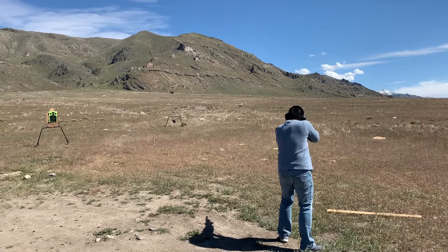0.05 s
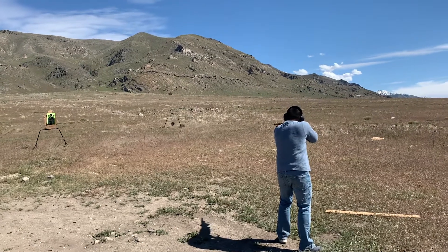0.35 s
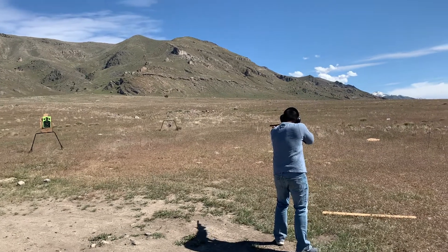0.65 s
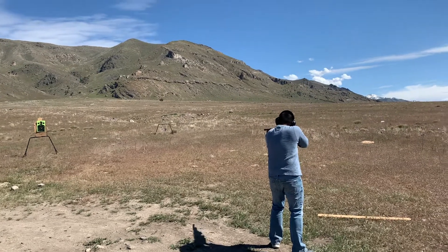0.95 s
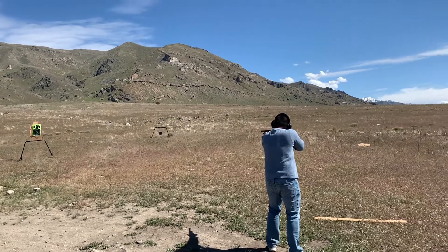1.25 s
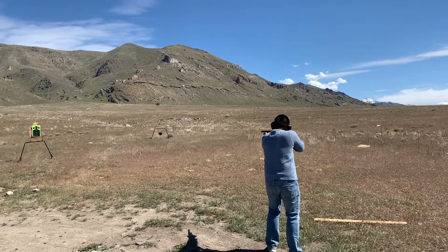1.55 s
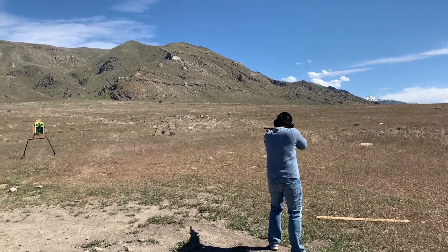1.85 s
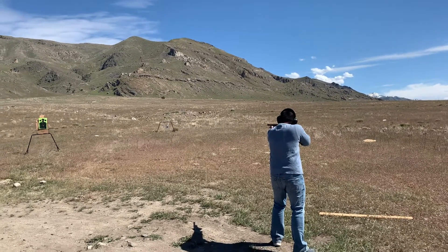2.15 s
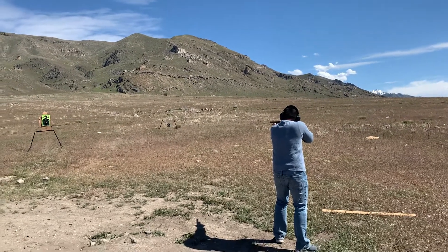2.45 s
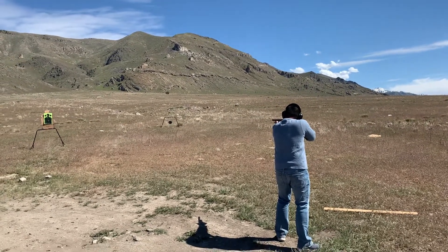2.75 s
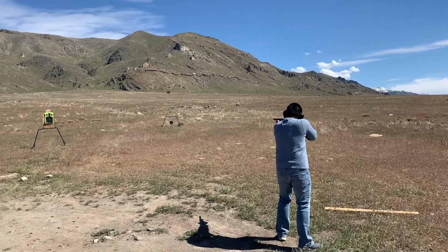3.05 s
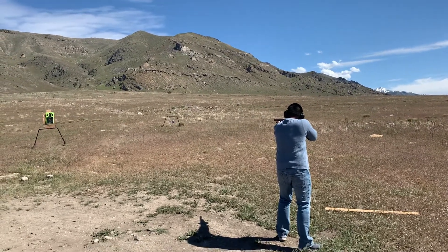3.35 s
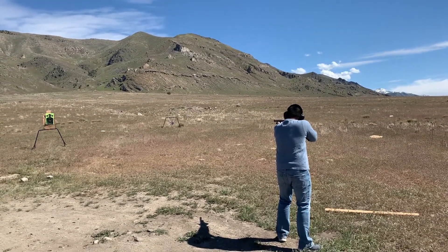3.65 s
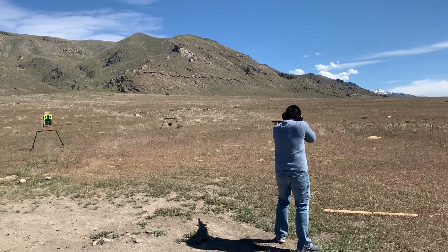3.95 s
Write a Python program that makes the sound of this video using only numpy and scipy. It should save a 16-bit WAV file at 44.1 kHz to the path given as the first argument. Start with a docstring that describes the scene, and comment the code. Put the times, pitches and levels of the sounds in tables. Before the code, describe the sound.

A pump-action shotgun is racked once a few metres away on an open plain: the slide scrapes back with a sharp clack, then snaps forward and locks. Afterwards, growing gusts of wind rumble and thump on the microphone.

```python
"""A pump-action shotgun is racked a few metres from a phone on an open plain: the slide scrapes back
and slams on its stop, then runs forward and locks. Each blow is a burst of steel clatter that rings
the gun's modes; rough ground scatters a short return. Wind buffets the microphone in growing gusts:
rumble, eddies and pressure pulses over a smooth rush. Far off, a small bird calls once, faintly."""
import sys
import numpy as np
from scipy import signal
from scipy.fft import rfft, irfft
from scipy.io import wavfile
from scipy.ndimage import uniform_filter1d

SR = 44100
rng = np.random.default_rng(int(sys.argv[2]) if len(sys.argv) > 2 else 0)


def wav_record(signal):
    """Record a signal, one row per channel, as 16-bit PCM in the file named by sys.argv[1]."""
    frames = np.transpose(np.atleast_2d(signal))
    bounded = np.clip(frames, -1, 1)
    # unit amplitude maps onto the largest positive 16-bit level
    quanta = np.round(bounded * 32767).astype(np.int16)
    wavfile.write(sys.argv[1], SR, quanta)


N = 176400
TIME_S = np.arange(N) / SR
FREQ_HZ = np.maximum(np.arange(N // 2 + 1) * SR / N, 1)

# Blows in the action. Each row: start in seconds, level in dB, clatter decay in seconds, ring centre in Hz.
BLOWS = [(0.48, -61.5, .001, 2520), (0.67, -57, 0.0064, 1700), (.698, -52.5, 0.0045, 2250),
         (.717, -54, 0.0028, 3230), (0.73, -49, 0.0037, 2060), (0.7751, -43, 0.0026, 10900),
         (.7785, -24.5, .0015, 1500), (0.7811, -27.5, 0.0014, 4670), (0.794, -34.5, 0.0016, 10960),
         (0.797, -34.5, .006, 800), (.808, -44, 0.0049, 1631), (.832, -55.5, 0.015, 1742),
         (.902, -71, 0.016, 2050), (.997, -60.5, 0.0055, 2120), (1.027, -61.5, 0.0085, 5000),
         (1.0469, -44.5, 0.0086, 2550), (1.077, -52, 0.0033, 4440), (1.0826, -46, 0.0027, 1510),
         (1.1268, -38, 0.0012, 1230), (1.1307, -34.5, 0.0053, 7300), (1.1387, -36, 0.0069, 1080)]
# Modes of receiver, barrel and fore-end. Each row: frequency in Hz, relative level in dB.
GUN_MODES = [(390, 1), (660, -1.5), (886, 6.5), (1170, -3.5), (1372, -1.5), (1495, 2), (1770, -6.5),
             (2108, -4), (2620, -0.5), (4020, 1.5), (4430, 0), (4980, -1.5), (5310, -3.5), (5850, -4.5),
             (7260, -7), (10450, 1)]
# Slide rubbing on its rails. Each row: start in seconds, end in seconds, level in dB.
SLIDE_STROKES = [(0.66, .782, -58.5), (1.05, 1.13, -53), (1, 1.1, -73.5)]
# Gun at the two microphone ports. Each row: frequency in Hz, left lead in radians, left over right in dB.
MIC_PORTS = [(700, 0, 0), (1250, -.7, -4), (1800, -.8, -2.5), (2600, .9, -7), (4800, 1.8, 1.5),
             (11000, 1.7, .5)]
# Light knocks and hard wind buffets. Each row: start in seconds, level in dB, upper cutoff in Hz.
KNOCKS = [(0.4827, -52, 573), (0.8811, -52.5, 2000), (1.3378, -54, 1040), (3.19, -66.5, 1900)]
BUFFETS = [(0.043, -31.5, 124), (0.247, -35, 66.4), (1.503, -51, 390), (1.570, -52, 540), (1.609, -52, 591),
           (1.62, -48, 645), (1.625, -34.5, 131.4), (1.770, -54, 595), (1.979, -34.5, 85.7),
           (2.131, -51.5, 516), (2.3721, -44, 425), (2.409, -47.5, 607), (2.426, -43.5, 600),
           (2.433, -42, 560), (2.467, -48, 779), (2.592, -56.5, 646), (2.661, -45.5, 436),
           (2.735, -30, 155), (2.782, -41, 400), (2.812, -38.5, 793), (2.8131, -29, 232.4),
           (2.903, -30, 147.8), (2.9285, -24.5, 190), (2.9335, -43.5, 725), (2.977, -27.5, 167.4),
           (3.012, -34.5, 260), (3.125, -42, 765), (3.466, -49, 703.4)]
# Spells of fluttering air. Each row: start in seconds, end in seconds, level in dB.
FLUTTER_SPELLS = [(0.122, 0.188, -56), (1.5, 1.663, -54), (2.054, 2.163, -55.5), (2.398, 2.5, -45),
                  (2.49, 2.72, -56), (2.736, 3.294, -48), (3.301, 4.019, -58)]
# Wind envelopes. Each row: time in seconds, relative level in dB.
RUMBLE_ENVELOPE = [(0, -31.5), (.07, -50), (.35, -63), (.62, -62), (1.43, -78.5), (1.5, -46.5), (1.64, -46),
                   (1.89, -65), (2.05, -47), (2.22, -54.5), (2.65, -45), (2.77, -39), (2.97, -30),
                   (3.07, -44.5), (3.16, -36), (3.35, -49), (3.48, -43), (3.6, -55.5), (3.77, -31.5),
                   (3.86, -47)]
RUSH_ENVELOPE = [(1.4, -76.5), (2.6, -77), (3.15, -54), (3.62, -65), (3.78, -53), (4, -62)]
HISS_ENVELOPE = [(1.55, -94), (1.76, -81.5), (2, -96), (3.12, -79.5), (3.2, -68.5), (3.6, -86.5),
                 (3.8, -75)]
# Spectra of steel on steel, wind layers and open air. Each row: frequency in Hz, relative level in dB.
STEEL_SPECTRUM = [(100, -24.5), (360, -6), (1500, -1), (2500, 0.5), (3200, -3.5), (4400, -2.5), (8400, -12),
                  (11000, -5.5), (13600, -21.5), (15300, -14.5)]
RUMBLE_SPECTRUM = [(22, -21), (48, 8), (90, 3.5), (160, -8.5), (240, -21.5), (600, -82.5)]
FLUTTER_SPECTRUM = [(60, -5.5), (160, 16), (280, 9), (450, 0.5), (800, -20), (1200, -27), (1700, -64)]
BUFFET_SPECTRUM = [(1250, 0), (1650, -11)]
RUSH_SPECTRUM = [(300, 10), (600, -2), (1300, -18), (1800, -34), (9000, -70.5)]
HISS_SPECTRUM = [(400, -11), (1250, 6), (1520, -2), (1850, -20), (5000, -41)]
AIR_SPECTRUM = [(410, -29.5), (700, -4.5), (1770, -5.5), (8000, -18.5), (11200, -14), (16000, -26)]
# Bird note. Each row: start in seconds, length in seconds, start pitch in Hz, end pitch in Hz, level in dB.
BIRD_NOTES = [(1.933, 0.041, 3570, 3200, -79)]

HARD_BLOW_DB = -32.5
GUN_SINK_CYCLES, WIND_SINK_CYCLES = 2, 1.8
STEREO_CORNER_HZ = 2000  # the ports differ mostly above this


def gun(max_oblique_share=.55):
    """Action and knocks at the two ports, each with its ground return."""
    lead_rad, balance_db = over_hz(MIC_PORTS, column=1), over_hz(MIC_PORTS, column=2)
    oblique_share = max_oblique_share / (1 + (STEREO_CORNER_HZ / FREQ_HZ) ** 2)
    direct, oblique = rfft(knocks() + action()), rfft(action())
    ports = []
    for side in (1, -1):
        turn_rad = side * np.arcsin(oblique_share)
        blend = direct * np.cos(turn_rad) + oblique * np.sin(turn_rad)
        near = irfft(blend * undb(side * balance_db / 2) * np.exp(.5j * side * lead_rad), N)
        ports.append(near + ground_scatter(near))
    return np.array(ports)


def action(min_attack_s=.0008, ring_db=-2):
    """Each blow clatters and rings the gun; the slide scrapes between."""
    t = TIME_S[:N // 32]
    clatter, rings = 0, 0
    for start_s, db, decay_s, centre_hz in BLOWS:
        attack_s = min_attack_s * max(1, undb((HARD_BLOW_DB - db) / 5))  # light contacts creep in
        rise = np.minimum(t / attack_s, 1)
        fall = np.exp(-np.maximum(t - 2 * attack_s, 0) / decay_s)
        clatter += place(undb(db) * chatter(t, db) * rise * fall, start_s)
        rings += place(undb(db + ring_db) * unit_hit(rise * ring(t, centre_hz)), start_s)
    return sink(colour(clatter, over_hz(STEEL_SPECTRUM)) + rings + slide_scrape(), GUN_SINK_CYCLES)


def chatter(t, blow_db, grain_db=4, grains_per_s=900):
    """Parts chatter against each other: grainy noise, brighter for harder blows."""
    bins_hz = np.arange(len(t) // 2 + 1) * SR / len(t)
    bright_db = np.interp(bins_hz, FREQ_HZ, tilt(db_per_octave=.02 * (blow_db - HARD_BLOW_DB)))
    steel_db = np.interp(bins_hz, FREQ_HZ, over_hz(STEEL_SPECTRUM))
    grit = irfft(rfft(rng.standard_normal(len(t))) * undb(bright_db), len(t))
    grit /= np.sqrt(np.mean(undb(steel_db + bright_db) ** 2))  # offsets the steel filter's gain
    for _ in range(2):
        grain = np.interp(t * grains_per_s, np.arange(256), rng.standard_normal(256))
        grit *= unit(undb(grain_db * grain))
    return grit


def ring(t, centre_hz, width_octaves=.75, t60_s=.035, detune_share=.012):
    """Modes near the blow's centre frequency ring; they shift from blow to blow as the parts move."""
    hz, mode_db = np.array(GUN_MODES).T[:, :, None]
    reach = 1 / (1 + (np.log2(hz / centre_hz) / width_octaves) ** 2) ** 2
    detune, phase = rng.standard_normal((2, len(hz), 1))
    tones = np.sin(2 * np.pi * hz * (1 + detune_share * detune) * t + np.pi * phase)
    return (reach * undb(mode_db - 60 * t / t60_s) * tones).sum(0)


def slide_scrape(grain_db=4.5):
    """Grainy friction of the slide on its rails."""
    friction = noise() * undb(grain_db * wander(rate_hz=250))
    rub = unit(colour(friction, over_hz(STEEL_SPECTRUM) + tilt(db_per_octave=-2)))
    return rub * gates(SLIDE_STROKES, edge_s=.006)


def knocks(rattle_decay_s=.0033):
    """Light knocks sink into thuds, each smeared by a brief rattle."""
    thuds = sum(thud(*row, low_hz=280, cycles=GUN_SINK_CYCLES, order=2) for row in KNOCKS)
    return smear(thuds, noise() * np.exp(-TIME_S / rattle_decay_s))


def ground_scatter(near, level_db=-19, t60_s=.21):
    """Short diffuse return from rough ground."""
    response = colour(noise() * undb(-60 * TIME_S / t60_s), tilt(db_per_octave=1))
    return undb(level_db) * smear(near, response)


def wind_rumble(gain_db=2, waver_db=2.1):
    """Gusts on the microphone: low noise, levelled, then swelled."""
    low = colour(noise(), over_hz(RUMBLE_SPECTRUM))
    low /= np.sqrt(uniform_filter1d(low ** 2, size=3500, mode="wrap"))
    return low * undb(gain_db + waver_db * wander(rate_hz=30.056)) * over_time(RUMBLE_ENVELOPE)


def wind_buffets():
    """Single hard pressure pulses on the microphone."""
    pulses = sum(thud(*row, low_hz=120, cycles=WIND_SINK_CYCLES, order=5) for row in BUFFETS)
    return colour(pulses, over_hz(BUFFET_SPECTRUM))


def wind_flutter(eddies_per_s=220, spread_db=8.5):
    """Showers of small eddies, each a pulse of random size and sign."""
    arrivals = rng.random(N) < eddies_per_s / SR
    eddies = arrivals * undb(spread_db * np.minimum(noise(), 1)) * np.sign(noise())
    flutter = sink(colour(eddies, over_hz(FLUTTER_SPECTRUM)), WIND_SINK_CYCLES)
    return unit(flutter) * gates(FLUTTER_SPELLS, edge_s=.0059)


def wind_flow(spectrum, envelope, waver_db, waver_hz):
    """Smooth rush or hiss of wind, wavering in level."""
    flow = unit(colour(noise(), over_hz(spectrum)))
    return flow * undb(waver_db * wander(waver_hz)) * over_time(envelope)


def bird():
    """A distant bird's falling note."""
    call = np.zeros(N)
    for start_s, length_s, from_hz, to_hz, db in BIRD_NOTES:
        progress = np.clip((TIME_S - start_s) / length_s, 0, 1)
        pitch_hz = from_hz + (to_hz - from_hz) * progress
        call += undb(db) * np.sin(np.pi * progress) * np.sin(2 * np.pi * np.cumsum(pitch_hz) / SR)
    return call


def open_air(level_db=-86):
    """Faint hiss of open country, wider in the treble."""
    mid, side = (unit(colour(noise(), over_hz(AIR_SPECTRUM))) for _ in range(2))
    side = irfft(rfft(side) * np.minimum(FREQ_HZ / STEREO_CORNER_HZ, 1), N)
    return np.array([mid + side, mid - side]) * undb(level_db) / np.sqrt(2)


def thud(start_s, db, top_hz, low_hz, cycles, order):
    """Band-limited pressure pulse that sinks in pitch."""
    lowpass = signal.butter(order, top_hz, fs=SR, output="sos")
    highpass = signal.butter(2, min(low_hz, top_hz / 2), "high", fs=SR, output="sos")
    pulse = signal.sosfilt(np.vstack([lowpass, highpass]), place(np.ones(1), start_s) + 1e-18)
    return undb(db) * unit_hit(sink(pulse, cycles))


def sink(x, cycles):
    """Lows arrive late, so each pulse falls in pitch."""
    return irfft(rfft(x) * np.exp(-2j * np.pi * cycles * np.log(FREQ_HZ + 90)), N)


def smear(x, response):
    """Convolve with a response scaled to unit energy."""
    return signal.fftconvolve(x, response / np.linalg.norm(response))[:N]


def colour(x, db):
    """Minimum-phase filter with the given dB per bin."""
    cepstrum = irfft(db * np.log(10) / 20, N)
    cepstrum[1:N // 2] *= 2
    cepstrum[N // 2 + 1:] = 0
    return irfft(rfft(x) * np.exp(rfft(cepstrum)), N)


def tilt(db_per_octave):
    """Slope in dB about 2500 Hz, flat below 300 Hz."""
    return db_per_octave * np.log2(np.maximum(FREQ_HZ, 300) / 2500)


def over_hz(table, column=1):
    """Table column interpolated over log frequency."""
    points = np.array(table, float)
    return np.interp(np.log(FREQ_HZ), np.log(points[:, 0]), points[:, column])


def over_time(envelope):
    """Gain per sample from an envelope table."""
    return undb(np.interp(TIME_S, *np.array(envelope).T))


def gates(spans, edge_s):
    """Summed gain of soft-edged gates."""
    return sum(undb(db) * np.clip(np.minimum(TIME_S - start_s, end_s - TIME_S) / edge_s + .5, 0, 1)
               for start_s, end_s, db in spans)


def place(x, start_s):
    """Put a short sound at its time."""
    return np.pad(x, (int(start_s * SR), N))[:N]


def noise():
    """White noise."""
    return rng.standard_normal(N)


def wander(rate_hz):
    """Smooth random curve, rms 1."""
    knots = rng.standard_normal(4096)
    return unit(np.interp(TIME_S * rate_hz, np.arange(len(knots)), knots))


def undb(db):
    """Decibels to gain."""
    return 10 ** (np.asarray(db) / 20)


def unit(x):
    """Scale to rms 1."""
    return x / np.sqrt(np.mean(x ** 2))


def unit_hit(x):
    """Scale the loudest 4 ms to rms 1."""
    return x / np.sqrt(uniform_filter1d(x ** 2, size=176).max())


def scene():
    """Gun, wind, bird and open country."""
    foreground = gun() + wind_rumble() + wind_buffets() + wind_flutter()
    rush = wind_flow(RUSH_SPECTRUM, RUSH_ENVELOPE, waver_db=2, waver_hz=27)
    hiss = wind_flow(HISS_SPECTRUM, HISS_ENVELOPE, waver_db=1.5, waver_hz=21)
    return foreground + rush + hiss + bird() + open_air()


def record(dry):
    """The phone cuts the top at 15.9 kHz."""
    return signal.sosfilt(signal.ellip(8, .2, 70, 15900, fs=SR, output="sos"), dry)


dry = scene()
out = record(dry)
wav_record(out)
```